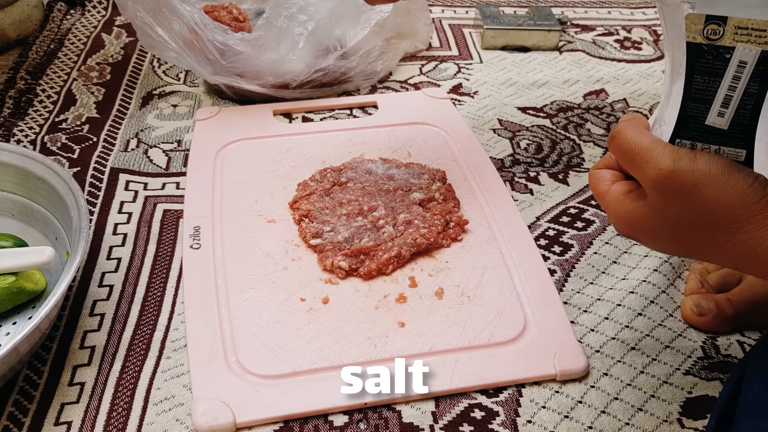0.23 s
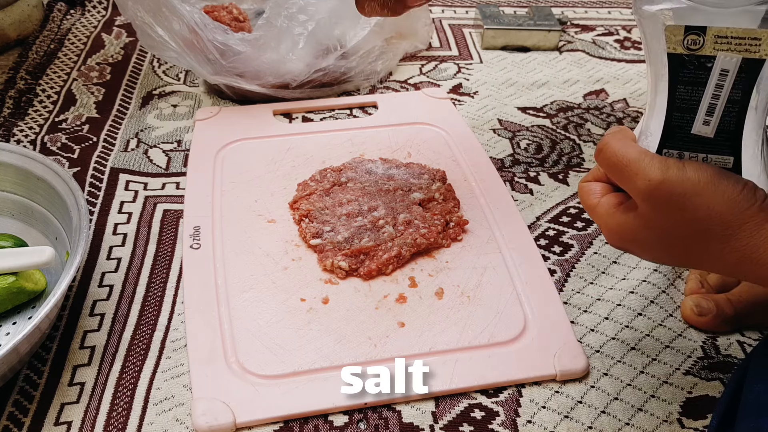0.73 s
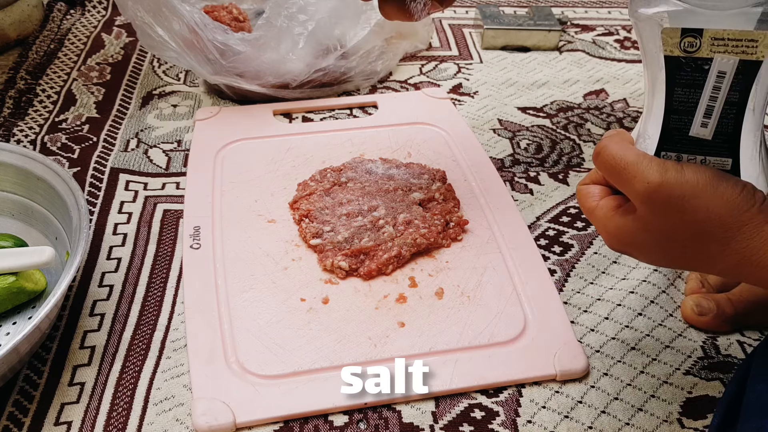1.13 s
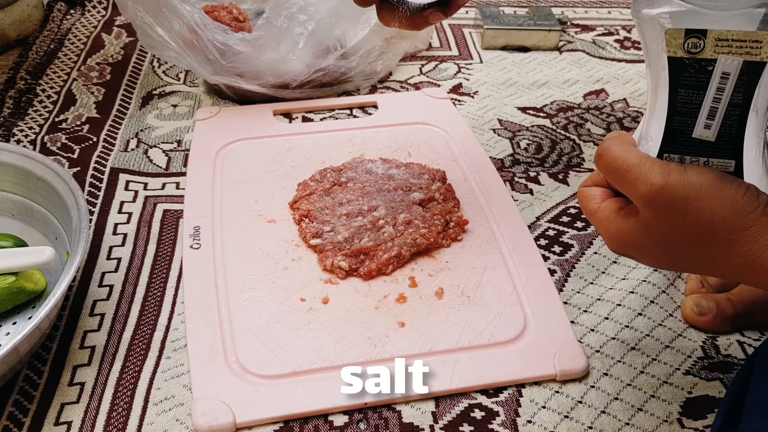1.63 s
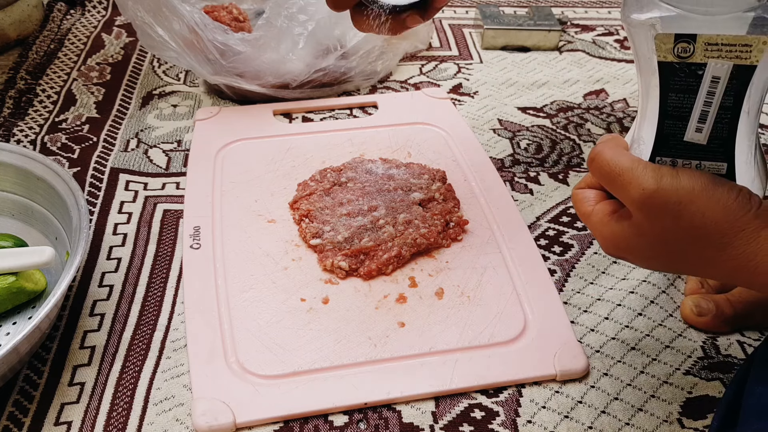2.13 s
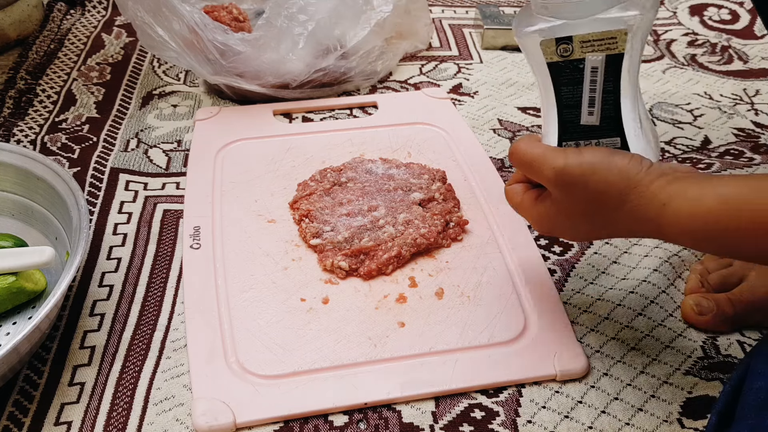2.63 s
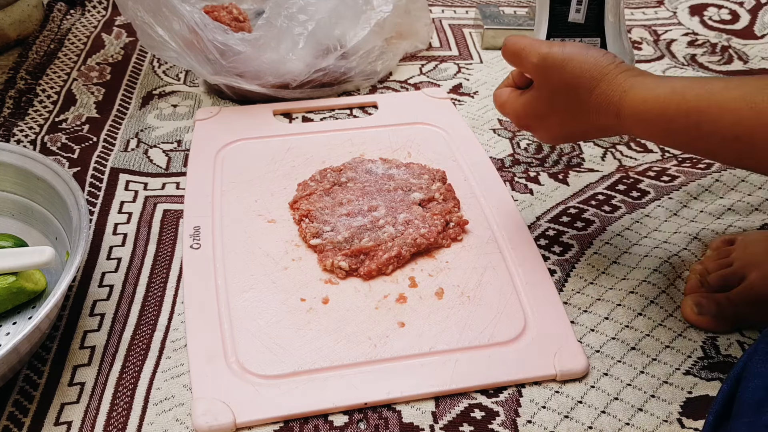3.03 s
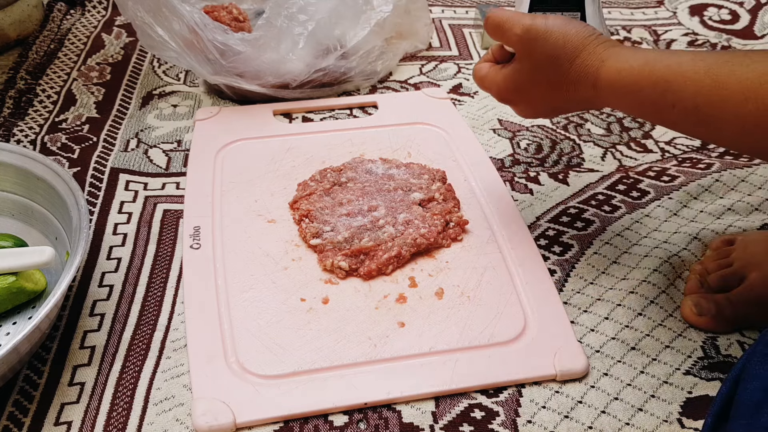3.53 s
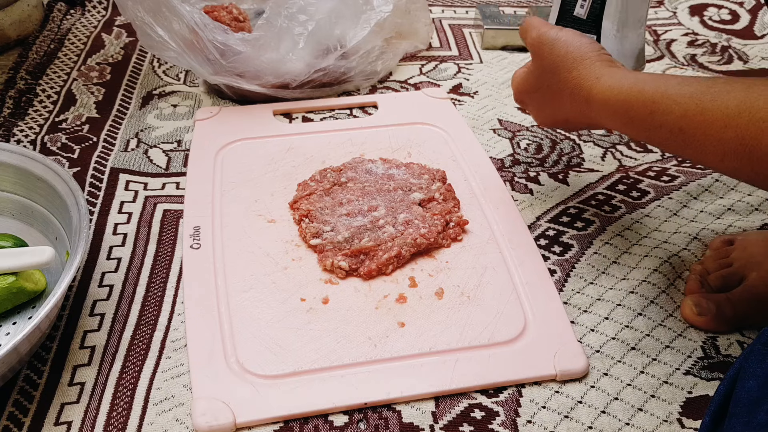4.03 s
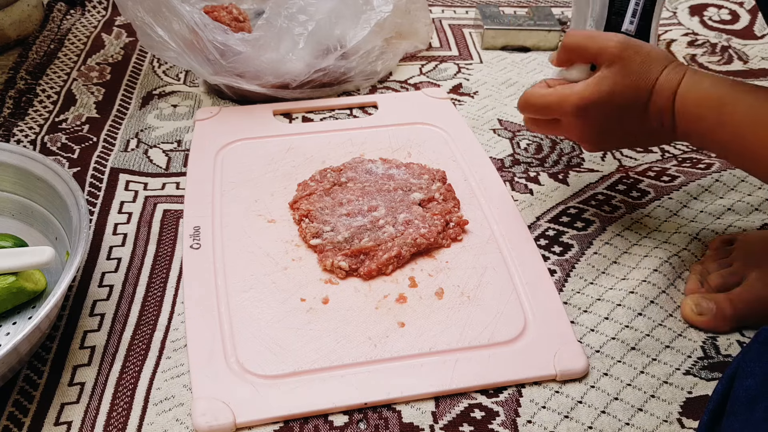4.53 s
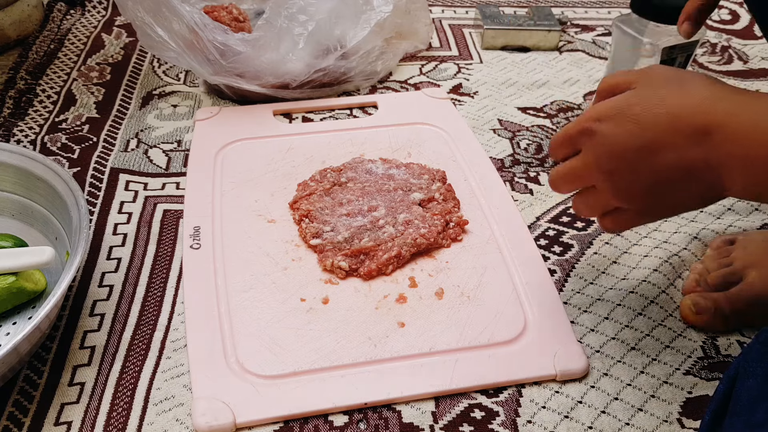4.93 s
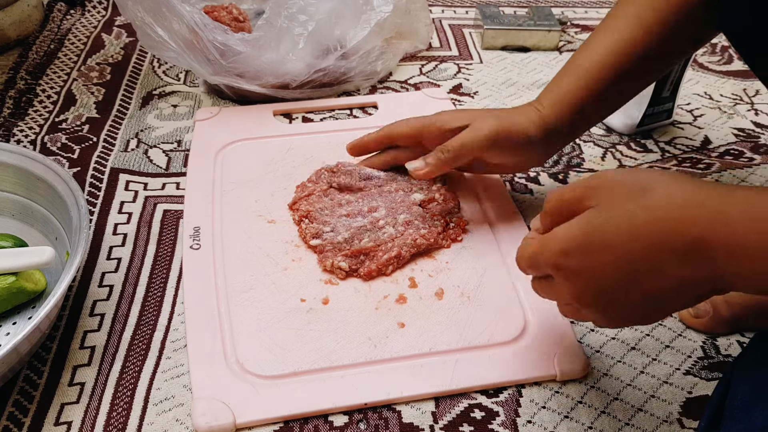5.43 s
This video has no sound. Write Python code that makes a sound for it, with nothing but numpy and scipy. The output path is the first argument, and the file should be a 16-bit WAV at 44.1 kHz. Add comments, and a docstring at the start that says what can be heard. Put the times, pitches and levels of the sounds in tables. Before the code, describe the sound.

A small hard-surfaced room with a steady, slightly shifting treble hiss and faint distant traffic rumble. After about three quiet seconds, a plastic salt shaker makes two faint touches, one crisp knock, then a fast irregular rattle of dull taps with short echoing tails. A few stray taps follow, with faint hand rustle. Close stereo microphone, knocks and hiss a little stronger on the left.

```python
"""Salt shaker in a small hard room

A plastic salt shaker knocks a few times, its damped modes carried on by short echoing tails.
Two ticks of salt are brief treble sines. A hiss of shaped noise with drifting bands fills the treble.
Far traffic rumbles underneath as low noise, with a soft room murmur and rustling hands.
Low tones are wavering sines; one, a passing engine, swells, then sinks in pitch as it fades.
Two microphone ports hear it all.
"""
import sys
import numpy as np
from scipy import signal
from scipy.fft import rfft, irfft, next_fast_len
from scipy.io import wavfile
from scipy.ndimage import uniform_filter1d, map_coordinates

SR = 44100
rng = np.random.default_rng(int(sys.argv[2]) if len(sys.argv) > 2 else 0)


def wav_record(signal):
    """Record a signal, one row per channel, as 16-bit PCM in the file named by sys.argv[1]."""
    frames = np.transpose(np.atleast_2d(signal))
    bounded = np.clip(frames, -1, 1)
    # unit amplitude maps onto the largest positive 16-bit level
    quanta = np.round(bounded * 32767).astype(np.int16)
    wavfile.write(sys.argv[1], SR, quanta)


N = 250179  # length in samples

# Shaker knocks: t/s, blow peak level/dB before damping and port balance,
# then level/dB of the modes up to 310 Hz, at 850-1450 Hz and from 1650 Hz, rise/s, room send level/dB
KNOCKS = [ (3.024, -54, -11, -19, -20.5, 0.0047, -7), (3.057, -59.5, -18, -19, -20.5, 0.0073, -16),
          (3.385, -44.5, -17, -6.5, -12.5, 0.0042, -0.5), (3.5041, -30, -17, -3, -13, 0.0012, -5.5),
          (3.516, -40, -11, -3, -8, 0.0009, 1), (3.623, -37, -13, -0.5, -1.5, 0.0009, -2),
          (3.635, -37.5, -22, 3, 1, 0.0003, -3.5), (3.668, -45.5, -28, -1.5, -20, .0012, 3.5),
          (3.687, -51, -12, -3, -4, .0013, -1), (3.727, -46.5, 4, 3, -1, 0.0013, -1),
          (3.759, -47.5, -16, 0, -14, .001, 5), (3.775, -39.5, -16.5, 2.5, -15, 0.007, -5),
          (3.791, -42.5, 7, -10, -19.5, 0.0074, -4.5), (3.807, -40.5, 2.5, 9, 2.5, 0.0028, -5.5),
          (3.818, -39, 5.5, -6, -1, 0.00077, -7), (3.838, -38.5, 11, 3, -10.5, 0.0007, -6),
          (3.862, -52, 15.5, -6, -14.5, 0.0032, -17), (3.942, -46.5, 6.5, 7, -16.5, 0.002, -3.5),
          (4.058, -49.5, -2, -6, -15.5, 0.0041, -0.5), (4.162, -45, -8, 1, -7, 0.0013, 0),
          (4.84, -51.5, -1, -7, -12, 0.0032, -10), (5.47, -57, -11, -11, -4, 0.0024, 5)]
LEFT_LEAD_S = 0.00012  # the left port hears the knocks first
FREE_S, FREE_PER_RISE = 0.0045, 3.1  # free ringing before the hand damps it: the softer the blow, the longer


def taps():
    """Each knock rings until the hand damps it; the room carries it on."""
    out = np.zeros((2, N + SR))
    t = np.arange(SR // 8) / SR
    for start_s, peak_db, low_db, mid_db, high_db, rise_s, room_db in KNOCKS:
        blow = ring(low_db, mid_db, high_db)
        blow *= 1 - np.exp(-t / rise_s)  # plastic gives before it rings
        blow *= amp(peak_db) / np.abs(blow).max()
        free_s = FREE_S + FREE_PER_RISE * rise_s
        damping = 1 / (1 + np.exp(np.clip((t - free_s) / 0.0011, -50, 50)))
        into_room = blow * (0.85 * damping + 0.31)
        heard = amp(room_db) * signal.fftconvolve(into_room[None], room(), axes=1)
        heard[:, :len(blow)] += blow * damping
        for port, lag_s in enumerate((0, LEFT_LEAD_S)):
            first = round((start_s + lag_s) * SR)
            out[port, first:][:heard.shape[1]] += heard[port]
    return out[:, :N] * amp([[1.8], [-1.8]])  # dB, left and right


# Modes of the shaker and the floor under it: f/Hz, width/Hz, relative level/dB
SHAKER_MODES = [(189, 24, -5), (226, 17, 0), (289, 22, 3.5), (406, 25, -6), (491, 28, -5.5), (539, 42, 1),
                (591, 39, -4.5), (675, 28, -18), (836, 84, 2.5), (1008, 52, 0), (1114, 41, -2),
                (1239, 58, -3), (1490, 230, 2), (1674, 184, 7), (1950, 270, 10), (2260, 280, 0),
                (2930, 440, 2), (3380, 450, 7), (4400, 750, -7)]


def ring(low_db, mid_db, high_db):
    """The shaker's decaying modes at one blow's balance; the grip shifts them a little each time."""
    hz, width_hz, mode_db = np.transpose(SHAKER_MODES)[:, :, None]
    balance = [(310, low_db), (450, 0), (700, 0), (850, mid_db), (1450, mid_db), (1650, high_db)]
    mode_db = mode_db + along(balance, hz)
    strength, shift = rng.standard_normal((2, *hz.shape))
    t = np.arange(SR // 8) / SR
    decay = amp(mode_db + 1.2 * strength) * np.exp(-np.pi * width_hz * t)
    modes = decay * np.sin(2 * np.pi * hz * (1 + 0.025 * shift) * t)
    # salt jumps inside: smoothed noise falling 60 dB in 18 ms
    grains = np.convolve(rng.standard_normal(len(t)), np.hanning(11) / 4, "same")
    return modes.sum(axis=0) + amp(high_db + 14.0 - 60 * t / 0.018) * grains


# Reverberation of the small hard room: f/Hz, time to fall 60 dB/s (before the late thinning)
ROOM_T60 = [(200, 0.24), (500, 0.5), (1200, 0.43), (3000, 0.58)]


def room():
    """A fresh tail for each knock: dense echoes hold for a moment, then thin out."""
    hz, t, z = signal.stft(rng.standard_normal((2, SR // 2)), SR, nperseg=256)
    hold = amp(-7 / (1 + np.exp((0.075 - t) / 0.0066)))  # an extra 7 dB down after about 75 ms
    z = np.array([z[0], 0.51 * z[0] + 0.85 * z[1]])  # the ports share part of the tail
    decay = amp(-60 * t / along(ROOM_T60, hz)[:, None])
    tail = signal.istft(z * hold * decay, SR, nperseg=256)[1]
    return np.pad(tail / np.linalg.norm(tail[0]), ((0, 0), (round(0.01 * SR), 0)))


# Thin ticks of salt on the cap: t/s, starting level/dB
SALT_TICKS = [(3.505, -48), (4.1625, -48)]
TICK_HZ, TICK_DECAY_S = 11100, 0.00074


def ticks():
    """Each tick is a quickly decaying treble sine, alike at both ports."""
    out = np.zeros(N)
    t = np.arange(SR // 200) / SR
    for start_s, db in SALT_TICKS:
        tick = amp(db) * np.exp(-t / TICK_DECAY_S) * np.sin(2 * np.pi * TICK_HZ * t)
        out[round(start_s * SR):][:len(t)] += tick
    return out


# Course of the hiss: t/s, bed level/dB, low band f/Hz, low band level/dB, high band level/dB
HISS_COURSE = [(0, -58, 6000, -62, -62.5), (.35, -59, 5980, -62.5, -64), (.75, -56.5, 6150, -60.5, -63.5),
               (1.23, -60.5, 6260, -61, -62.5), (1.58, -60, 6630, -62.5, -60.5),
               (1.78, -59.5, 6770, -64, -56.5), (2.1, -60, 6550, -59.5, -58), (2.5, -59, 6600, -58.5, -61),
               (3.16, -59, 6060, -59, -62.5), (3.41, -56.5, 6500, -58.5, -59),
               (3.69, -57.5, 6180, -59.5, -63.5), (4.17, -59.5, 6460, -59, -60.5),
               (4.42, -60.5, 6100, -61, -65.5), (4.72, -60, 6550, -58.5, -59.5),
               (5.18, -60, 5960, -64.5, -67.5), (5.46, -57, 5910, -63, -63), (5.67, -60.5, 5900, -63, -65)]
# Colour of the hiss bed: f/Hz, relative level/dB per Hz
HISS_BED = [(1500, -58), (2000, -16), (2800, -8.5), (3300, -5), (3600, -1), (3950, -5.5), (5200, -1.5),
            (6400, -6), (7600, -8.5), (8400, -7.5), (10300, -6.5), (11800, -7.5), (13000, -13),
            (13300, -14.5), (15700, -19)]
# Level of the band that stays put: t/s, level/dB
STEADY_BAND = [(0, -69.5), (1.7, -64.5), (3.5, -69), (5.67, -68)]
# Swells of a band between the two drifting ones: t/s, peak level/dB, rise/s, fall/s
BETWEEN_SWELLS = [(1.67, -60, 0.091, 0.31), (2.35, -63, 0.022, 0.16)]
# Clearest swells of the thin flickering band: t/s, peak level/dB, rise/s, fall/s
FLICKER_SWELLS = [(1.31, -73.5, 0.04, 0.069), (4.05, -79, 0.089, 0.049), (4.93, -81, 0.19, .05),
                  (5.44, -84, 0.17, 0.065)]
HIGH_HZ, HIGH_FOLLOWS = 10030, 0.67  # mean centre of the high band; its share of the low band's drift
STEADY_HZ, BETWEEN_HZ, FLICKER_HZ = 8890, 7450, 1476
FLICKER_DB, FLICKER_DEPTH_DB, FLICKER_RATE = -81.5, 4, 11  # random coming and going, knots a second
# left over right, dB
LOW_PAN_DB, HIGH_PAN_DB, STEADY_PAN_DB, BETWEEN_PAN_DB, FLICKER_PAN_DB = 3, 7, 16, 1, 7


def hiss():
    """A smooth noise bed with narrower noise bands on it; the two strong bands drift together."""
    bed_db, low_hz, low_db, high_db = curves(HISS_COURSE)
    bed = amp(bed_db + 1.47 * wobble(3.55)) * rush(HISS_BED)
    low = band(low_hz, amp(low_db), LOW_PAN_DB, width_hz=560, patchy_db=2.7, apart_hz=-78, steep=2.16)
    high_hz = HIGH_HZ + HIGH_FOLLOWS * (low_hz - low_hz.mean())
    high = band(high_hz, amp(high_db), HIGH_PAN_DB, width_hz=650, patchy_db=2.5, apart_hz=504, steep=1.8)
    between_gain = swells(BETWEEN_SWELLS)
    between = band(BETWEEN_HZ, between_gain, BETWEEN_PAN_DB, width_hz=580, patchy_db=4.0, steep=2.5)
    steady_gain = amp(curves(STEADY_BAND)[0])
    steady = band(STEADY_HZ, steady_gain, STEADY_PAN_DB, width_hz=840, patchy_db=3.0)
    flicker_gain = amp(FLICKER_DB + FLICKER_DEPTH_DB * wobble(FLICKER_RATE)) + swells(FLICKER_SWELLS)
    flicker = band(FLICKER_HZ, flicker_gain, FLICKER_PAN_DB, width_hz=77, patchy_db=0.5)
    return bed + low + high + between + steady + flicker


def band(centre_hz, gain, pan_db, width_hz, patchy_db, apart_hz=0, steep=2):
    """Noise band with a centre that may drift, a patchy level and apart_hz added at the right port."""
    hz, t, z = signal.stft(ports(), SR, nperseg=512)
    centre = np.interp(t, np.arange(N) / SR, centre_hz + np.zeros(N))
    offset = hz[:, None] - centre - np.array([[[0]], [[apart_hz]]])
    shape = 1 / (1 + np.abs(offset / width_hz) ** steep)
    patches = uniform_filter1d(rng.standard_normal(z.shape), size=2, axis=1)  # across frequency
    patches = uniform_filter1d(patches, size=10, axis=2)  # across time
    shaped = z * shape * amp(patchy_db * unit(patches))
    noise = unit(signal.istft(shaped, SR, nperseg=512)[1][:, :N])
    return noise * gain * amp(pan_db * np.array([[0.5], [-0.5]]))


# Level of the deep rumble: t/s, level/dB
RUMBLE_COURSE = [(0, -66), (.12, -56.5), (.6, -60.5), (1.2, -61.5), (2.4, -56.5), (3.0, -56), (3.52, -51.5),
                 (3.9, -54.5), (4.35, -49.5), (5.08, -56.5), (5.43, -52.5), (5.67, -61)]
# Colour of the deep rumble: f/Hz, relative level/dB per Hz
DEEP_RUMBLE = [(12, -40), (20, -13.5), (32, -3.5), (54, 1.5), (86, -3), (112, -7.5), (120, -1.5),
               (160, -31), (260, -120)]
# Colour of the upper rumble: f/Hz, relative level/dB per Hz
UPPER_RUMBLE = [(35, -48), (60, -2.5), (97, -1), (129, -12), (156, -6.5), (183, -13), (231, -14),
                (264, -18), (500, -35.5), (650, -85), (1100, -120)]
UPPER_DB, UPPER_FOLLOWS = -57.5, 0.25  # mean level; dB of the upper rumble per dB of the deep


def traffic():
    """Far traffic as noise in two low ranges; the upper partly follows the level of the deep."""
    deep_db, = curves(RUMBLE_COURSE)
    upper_db = UPPER_DB + UPPER_FOLLOWS * (deep_db - deep_db.mean())
    deep = amp(deep_db + 2.1 * wobble(4.045)) * rush(DEEP_RUMBLE)
    upper = amp(upper_db + 3.0 * wobble(5.17)) * rush(UPPER_RUMBLE)
    return deep + upper


# The engine that passes: t/s, f/Hz, level/dB
PASSING_ENGINE = [(2.9, 94.7, -58), (2.98, 95.5, -50), (3.15, 98.07, -50.5), (3.6, 95.87, -42),
                  (3.8, 96.1, -46), (3.86, 95.5, -54), (4.07, 90.9, -50), (4.16, 84.4, -60)]
# Other low tones, each gliding straight: start t/s, end t/s, first f/Hz, last f/Hz, level/dB
GLIDING_TONES = [(0, 0.556, 109, 107.5, -56), (0, 1.19, 85, 79, -58), (0, .32, 144, 142.5, -61),
                 (.48, .9, 43, 44.9, -63), (0.596, 0.846, 138, 145.2, -64),
                 (1.363, 1.77, 105, 104.2, -56.5), (1.295, 1.775, 81, 77, -58.5),
                 (1.58, 1.847, 41, 39.5, -63), (1.93, 2.41, 83, 83.7, -58.5),
                 (2.046, 3.494, 152, 156.7, -63.5), (2.234, 2.55, 102, 101.5, -58.5),
                 (2.196, 2.997, 234.8, 227, -73.5), (2.307, 3.15, 53, 45.6, -58),
                 (2.793, 2.987, 78.5, 78.2, -56.5), (3.34, 4.616, 47.8, 48, -58),
                 (4.246, 4.42, 72, 76.6, -55), (4.46, 5.052, 85, 84.3, -55),
                 (4.424, 4.652, 114, 124, -59.5), (4.78, 5.05, 121, 127.8, -60.5),
                 (5.19, 5.674, 126, 135.6, -59.5), (5.3, 5.5, 74, 76, -59), (5.355, 5.677, 41.5, 39.3, -55)]


def low_tones():
    """The passing engine and other low tones, wavering sines a shade louder on the left."""
    lines = tone(PASSING_ENGINE, waver_hz=0.61, waver_db=0.5, apart=0.038)
    for start_s, end_s, first_hz, last_hz, db in GLIDING_TONES:
        glide = [(start_s, first_hz, db), (end_s, last_hz, db)]
        lines = lines + tone(glide, waver_hz=0.88, waver_db=2.0, apart=0.15)
    return lines * amp([[0.45], [-0.45]])


def tone(rows, waver_hz, waver_db, apart):
    """An unsteady sine fading outside its rows; its phase wanders apart at the ports (radians)."""
    hz, db = curves(rows)
    t = np.arange(N) / SR
    inside_s = np.minimum(t - rows[0][0], rows[-1][0] - t)
    gate = np.clip(inside_s / 0.057 + 1, 0, 1)
    phase = 2 * np.pi * np.cumsum(hz + waver_hz * wobble(6.06)) / SR
    level = np.sqrt(2) * gate * amp(db + waver_db * wobble(7.5))  # dB is the rms level
    return level * np.sin(phase + apart * wobble(1.9) * [[1], [-1]])


# Colour of the room's murmur: f/Hz, relative level/dB per Hz
ROOM_MURMUR = [(210, -5), (350, -9.5), (635, -8.5), (732, -9.5), (1460, -8), (1800, -11), (2200, -12.5),
               (2600, -12), (3380, -22.5), (5720, -120)]
# Rustles of the hands: t/s, peak level/dB, rise/s, fall/s
HAND_RUSTLES = [(0.02, -70.5, .05, .15), (1.7, -70.5, .15, .15), (4.24, -65, 0.11, 0.056),
                (4.85, -70.5, 0.17, 0.26), (5.47, -65, 0.13, 0.089)]
MURMUR_DB = -71  # mean level


def murmur():
    """The room's restless noise floor and the hands' rustle, sharing one noise colour."""
    floor = amp(MURMUR_DB + 0.9 * wobble(9))
    return np.hypot(floor, swells(HAND_RUSTLES)) * rush(ROOM_MURMUR)


# Level difference between the ports: f/Hz, left over right level/dB
PORT_TILT = [(60, 0.5), (92, 0), (140, 5), (210, 2.5), (330, 2.5), (500, 3), (770, 6.5), (1170, 6),
             (1790, 6), (2740, 8.5), (4190, 4.5), (6410, 0), (9810, -1), (15000, 4)]


def rush(spectrum):
    """Coloured port noise of rms 1."""
    sides = np.array([[0.5], [-0.5]])
    return unit(filtered(ports(), lambda hz: amp(along(spectrum, hz) + sides * along(PORT_TILT, hz))))


# Likeness of noise at the two ports: f/Hz, left-right likeness (0 to 1)
PORT_LIKENESS = [(30, 0.97), (90, 1), (300, 0.7), (700, 0.27), (1400, 0.16), (3000, 0.18), (6000, 0.37),
                 (9000, 0.09), (15000, 0.013)]
# Phase lead of the left port: f/Hz, lead/rad
PORT_LEAD = [(0, 0.5), (430, 0), (3360, 7), (3620, 7), (5510, 9.5), (7580, 15), (8180, 17.5), (8870, 26.5),
             (9470, 14), (9990, 19), (10300, 20.5), (11600, 30), (13700, 34), (15300, 38.5)]


def ports():
    """White noise at the two microphone ports: partly alike, the left one early."""
    def mix(hz):
        turn = np.arccos(np.clip(along(PORT_LIKENESS, hz), 0, 1)) / 2
        return np.array([np.cos(turn), np.sin(turn)])

    def lead(hz):
        radians = np.interp(hz, *np.transpose(PORT_LEAD))
        return np.exp(0.5j * radians * np.array([[1], [-1]]))

    mid, side = filtered(rng.standard_normal((2, N)), mix)
    return filtered(np.array([mid + side, mid - side]), lead)


def swells(rows):
    """Gain of bell-shaped swells, each with its own rise and fall."""
    t = np.arange(N) / SR
    gain = np.zeros(N)
    for peak_s, db, rise_s, fall_s in rows:
        gain += amp(db) * np.exp(-((t - peak_s) / np.where(t < peak_s, rise_s, fall_s)) ** 2)
    return gain


def wobble(rate):
    """A smooth random curve, rate knots a second."""
    knots = rng.standard_normal(int(N * rate / SR) + 4)
    return map_coordinates(knots, [np.arange(N) * rate / SR])


def curves(rows):
    """Each column after the time, joined by straight lines at every sample."""
    s, *columns = np.transpose(rows)
    return [np.interp(np.arange(N) / SR, s, column) for column in columns]


def along(points, hz):
    """Values of (Hz, value) points read on a log frequency axis."""
    f, value = np.transpose(points)
    return np.interp(np.log(hz + 1), np.log(f + 1), value)


def filtered(x, response):
    """x times a complex response of frequency, padded against wrap-around."""
    m = next_fast_len(x.shape[-1] + SR // 2)
    return irfft(rfft(x, m) * response(np.fft.rfftfreq(m, 1 / SR)), m)[..., :x.shape[-1]]


def amp(db):
    """Amplitude gain of a level in dB."""
    return 10 ** (np.asarray(db) / 20)


def unit(x):
    """x scaled to rms 1 over all its values."""
    return x / np.sqrt(np.mean(np.abs(x) ** 2) + 1e-20)


def scene():
    """The shaker and its salt in front, then the hiss, the traffic, the low tones and the room's murmur."""
    return taps() + ticks() + hiss() + traffic() + low_tones() + murmur()


def record(dry):
    """The microphone chain keeps nothing above its band limit."""
    return filtered(dry, lambda hz: hz < 15730)


dry = scene()
out = record(dry)
wav_record(out)
```